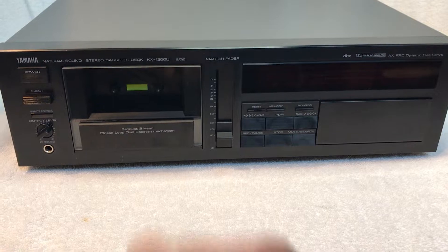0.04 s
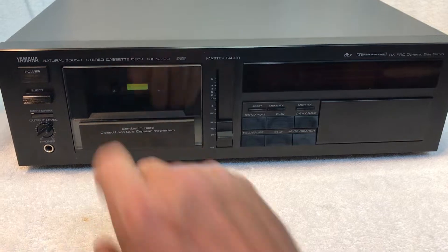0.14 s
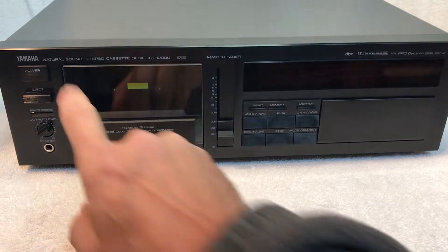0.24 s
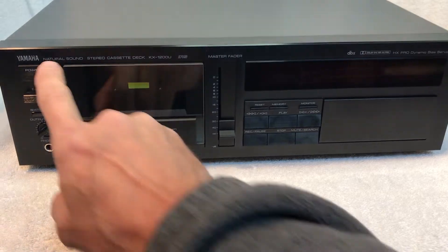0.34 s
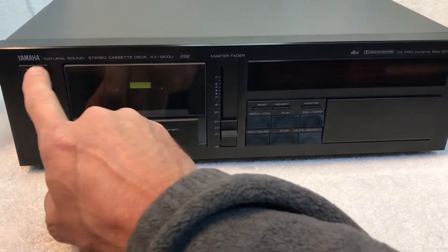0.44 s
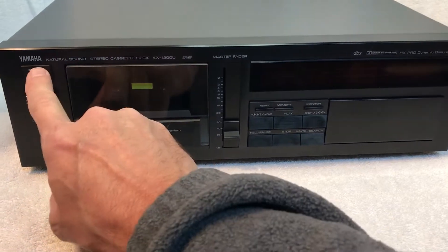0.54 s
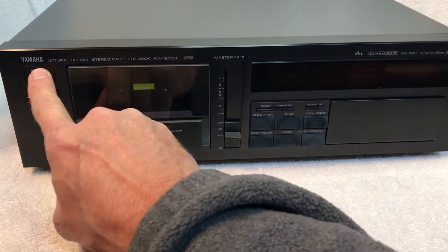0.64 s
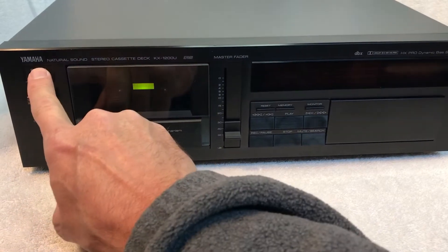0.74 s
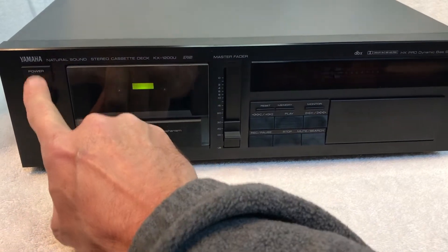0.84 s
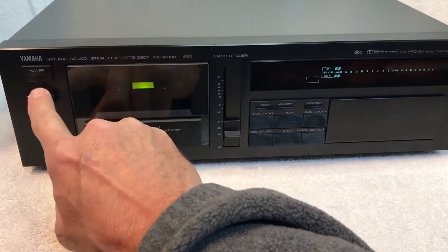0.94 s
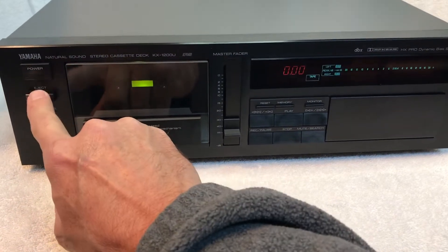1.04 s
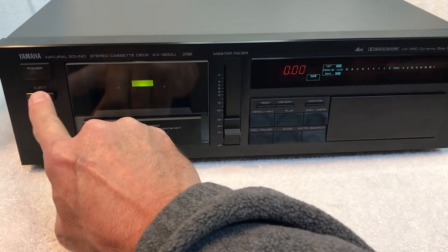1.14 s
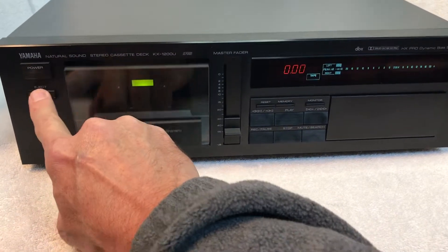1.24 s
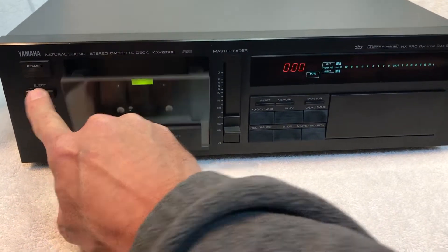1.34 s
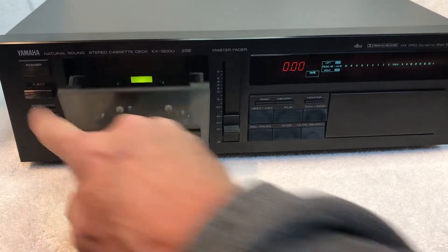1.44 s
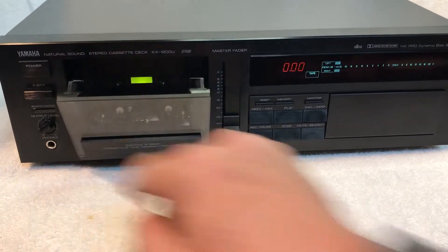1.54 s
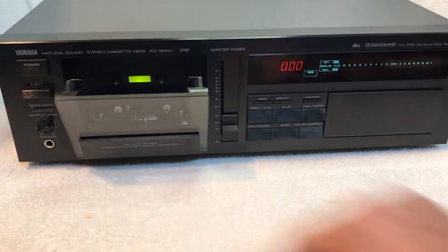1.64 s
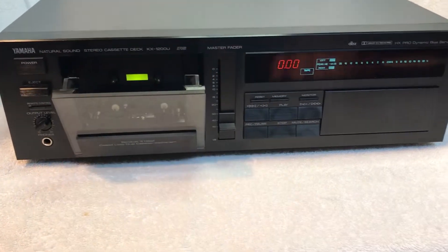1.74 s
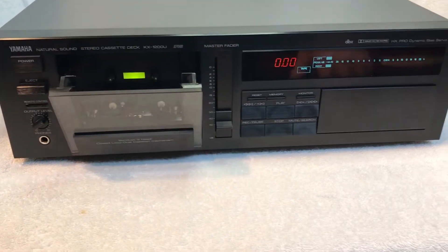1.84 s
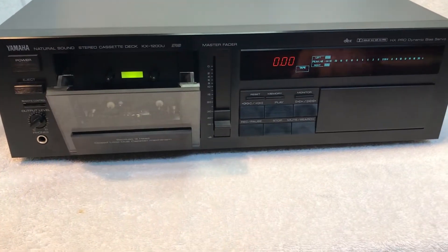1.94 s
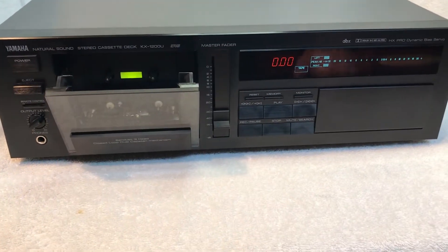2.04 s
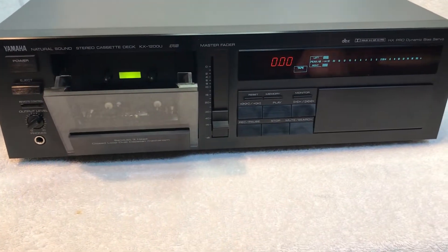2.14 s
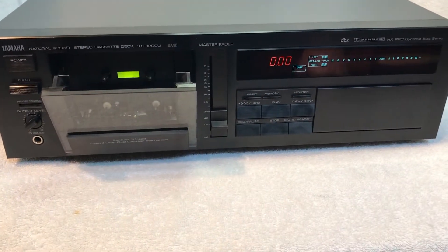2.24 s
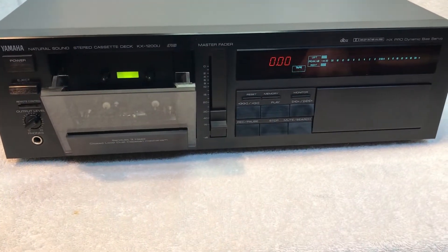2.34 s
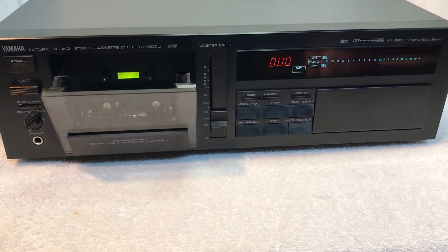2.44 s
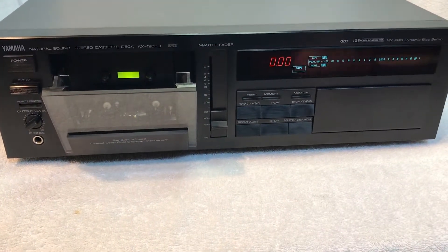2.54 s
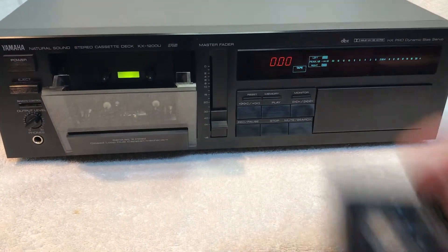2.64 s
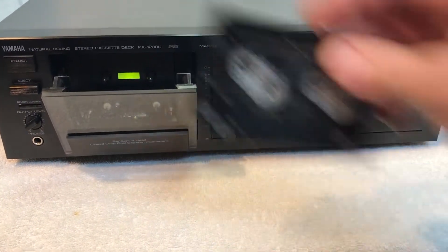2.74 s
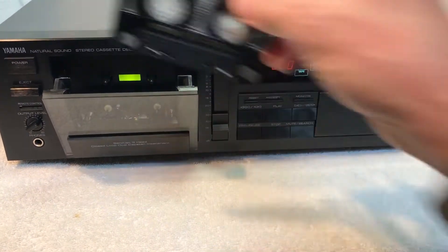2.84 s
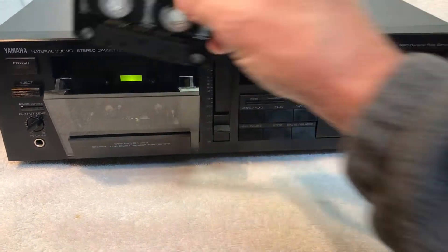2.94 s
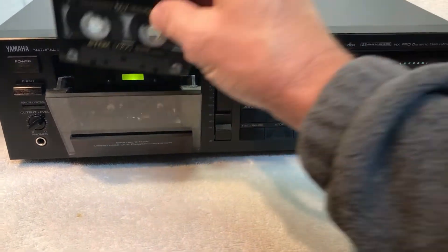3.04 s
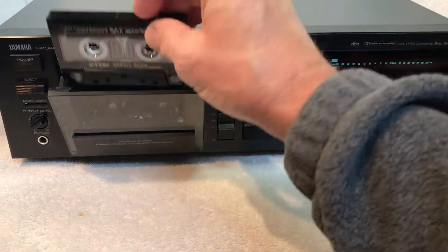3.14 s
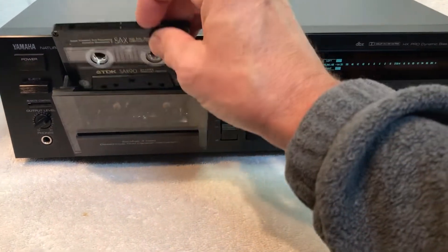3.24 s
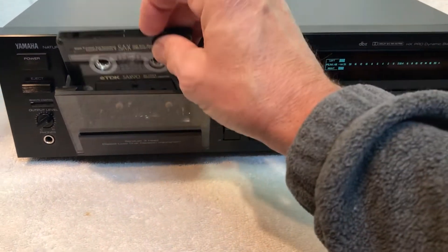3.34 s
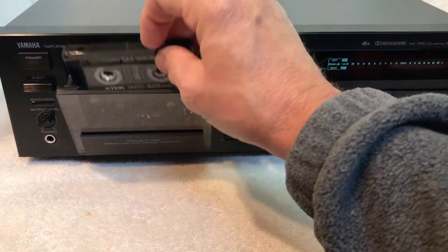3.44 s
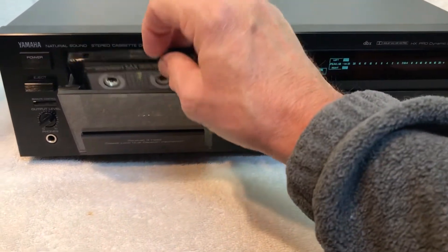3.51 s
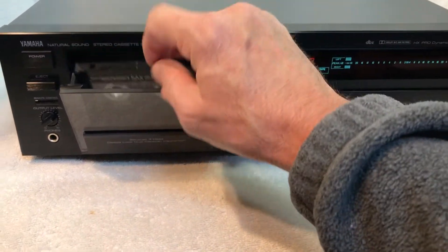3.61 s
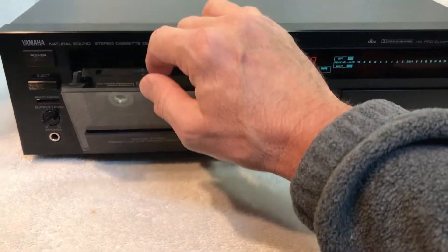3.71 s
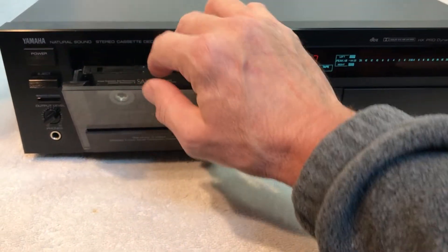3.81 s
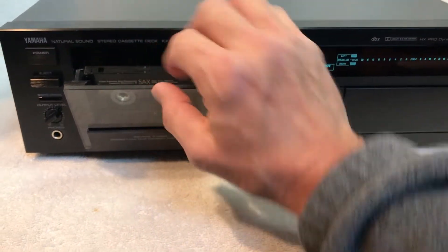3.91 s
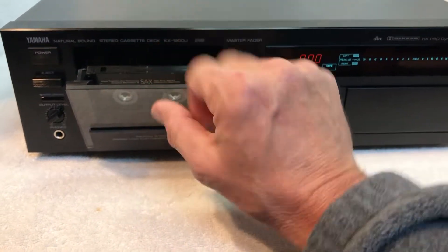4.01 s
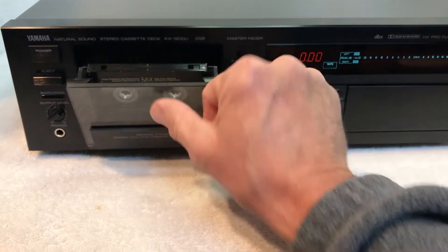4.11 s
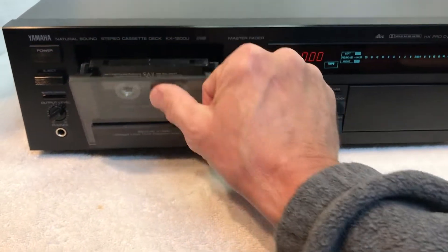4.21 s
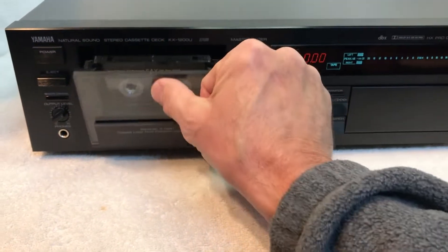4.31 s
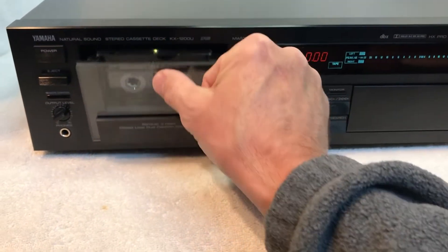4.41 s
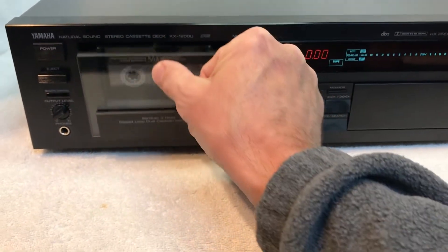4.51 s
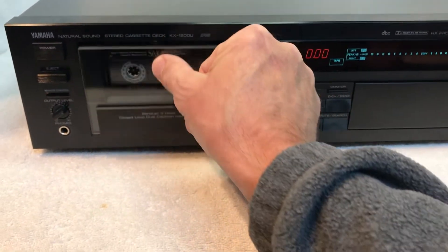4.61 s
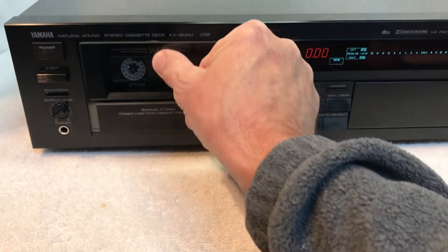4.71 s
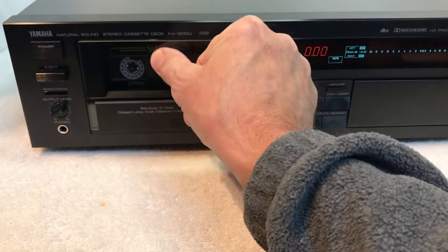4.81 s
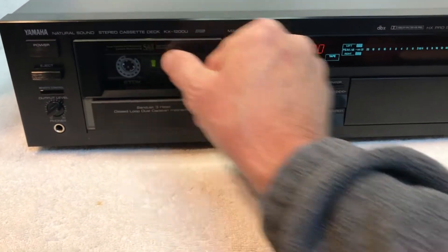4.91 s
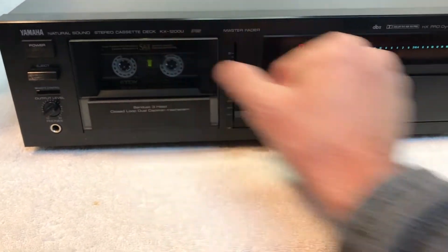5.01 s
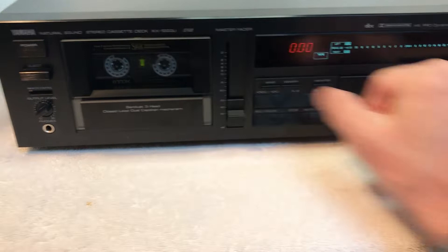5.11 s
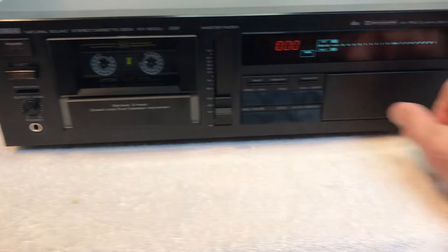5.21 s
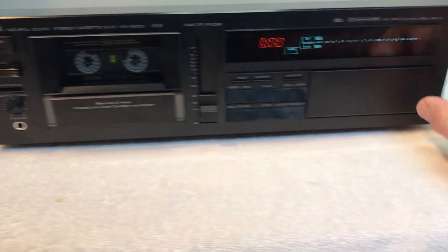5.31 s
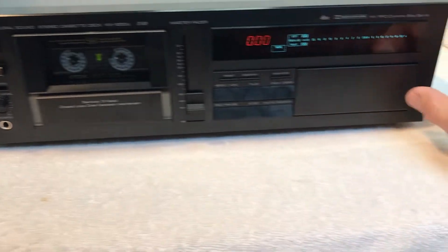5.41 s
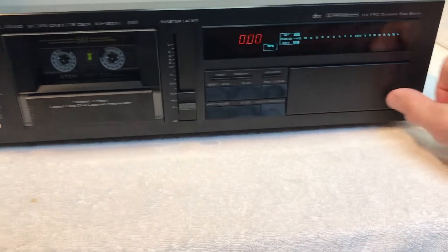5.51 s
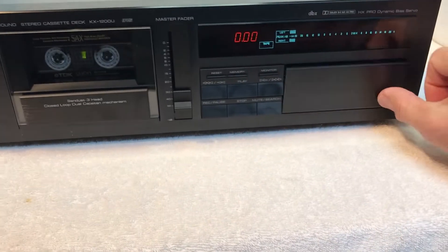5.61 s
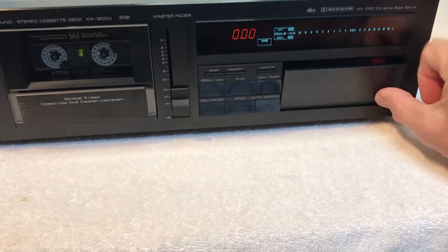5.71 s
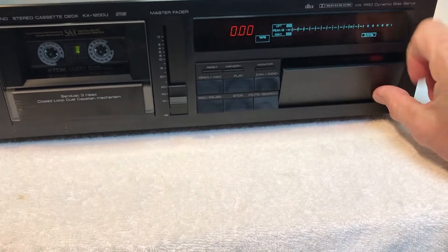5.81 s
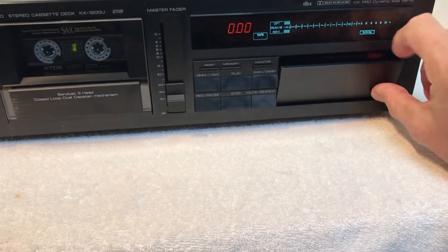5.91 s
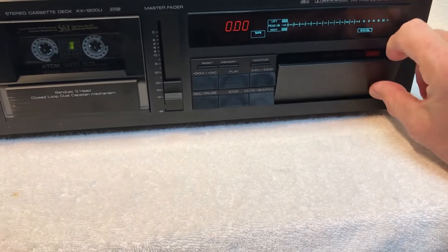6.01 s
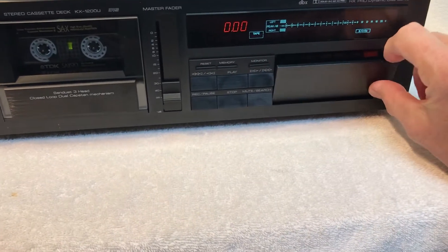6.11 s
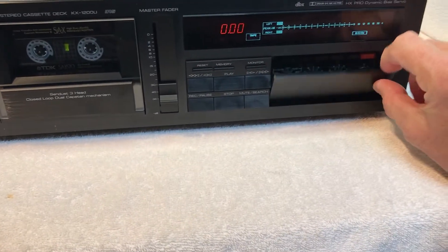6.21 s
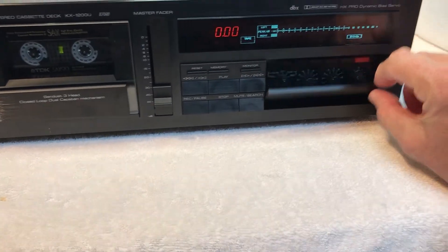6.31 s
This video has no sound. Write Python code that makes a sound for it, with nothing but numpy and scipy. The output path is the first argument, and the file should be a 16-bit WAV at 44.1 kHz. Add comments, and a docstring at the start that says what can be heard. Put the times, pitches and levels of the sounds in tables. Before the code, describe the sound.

Plastic clicks and clunks as a cassette deck is switched on, its door springs open, and a tape is loaded and shut in.

```python
"""A small quiet room, a cassette deck on a towel close to the microphone. The power button clicks, the
eject key lets the sprung door fly open, a cassette is picked up, slid in and dropped home, the door is
pushed shut and a flap is pressed open. Each knock is a short chatter of plastic that rings its part and
thumps the steel case; fingers and shells rub in between, over faint rumble, hum and hiss."""
import sys
import numpy as np
from scipy import signal
from scipy.fft import rfft, irfft
from scipy.io import wavfile
from scipy.ndimage import uniform_filter1d

SR = 44100
rng = np.random.default_rng(int(sys.argv[2]) if len(sys.argv) > 2 else 0)


def dump(signal):
    """Clip the signal to [-1, 1] and save it as 16-bit WAV at the path in sys.argv[1]."""
    limited = np.clip(np.atleast_2d(signal).T, -1, 1)
    pcm = np.round(limited * 32767).astype(np.int16)
    wavfile.write(sys.argv[1], SR, pcm)


N = 280035


def undb(db):
    """Decibels to gain."""
    return 10 ** (np.asarray(db) / 20)


def unit(x):
    """Scale to rms 1."""
    return x / np.sqrt(np.mean(x ** 2))


def decay(t, t60_s):
    """Exponential fall, 60 dB in t60_s."""
    return np.exp(-np.log(1000) * t / t60_s)


def add(track, start_s, x):
    """Mix x into the track at start_s."""
    i = max(int(start_s * SR), 0)
    track[i:i + len(x)] += x[:max(N - i, 0)]


def colour(x, points):
    """Minimum-phase filter through (f/Hz, gain/dB) points."""
    size = 2048
    hz, db = np.transpose(points)
    log_hz = np.log(np.fft.rfftfreq(size, 1 / SR) + 1)
    gain = undb(np.interp(log_hz, np.log(hz), db))
    cepstrum = irfft(np.log(gain))
    cepstrum[1:size // 2] *= 2
    cepstrum[size // 2 + 1:] = 0
    response = irfft(np.exp(rfft(cepstrum)))
    return signal.oaconvolve(x, response)[:len(x)]


def plastic(low_db, treble_db):
    """Contact spectrum: heavy parts add low-mids, hard edges add treble."""
    return [(90, low_db - 19), (300, low_db - 8.5), (470, low_db - 3), (650, low_db + 1),
            (1300, 0.11 * low_db), (3400, 0.0075), (7500, treble_db - 4), (15000, 1.3 * treble_db - 11)]


def ring(x, modes):
    """The contact plus the damped modes it excites."""
    t = np.arange(SR // 2) / SR
    response = np.zeros(len(t))
    response[0] = 1
    for hz, t60_s, db in modes:
        damping = np.log(1000) / t60_s
        response += undb(db) * 2 * damping / SR * decay(t, t60_s) * np.cos(2 * np.pi * hz * t)
    return signal.oaconvolve(x, response)[:N]


def spot_ring(x, hz, boost_db, q):
    """The touched spot rings for a few cycles at its own pitch."""
    b, a = signal.iirpeak(hz, q, fs=SR)
    return x + undb(boost_db) * signal.lfilter(b, a, x)


def grains(count, grit_db):
    """Tiny collisions of bounded size; grit spreads their sizes."""
    noise, size = rng.standard_normal((2, count))
    spread = np.repeat(2 * np.tanh(size / 2), 20)[:count]
    return unit(noise * undb(grit_db * spread))


def stroke(middle_s, half_s, db, grit_db):
    """Stick-slip contact that swells and fades; returns start time and force."""
    count = SR // 2
    t = (np.arange(count) - count / 2) / SR
    speed = np.exp(-(t / half_s) ** 2)
    grip = unit(uniform_filter1d(rng.standard_normal(count), size=200))
    slips = undb(0.5 * grit_db * np.tanh(grip))
    force = unit(speed * slips * grains(count, grit_db))
    return middle_s + t[0], undb(db) * force * np.sqrt(np.mean(speed ** 2))


def chatter(t60_s, rise_s, grit_db):
    """Two parts meet and settle in a decaying burst of grains."""
    t = np.arange(8000) / SR
    envelope = (1 - np.exp(-t / rise_s)) * decay(t, t60_s)
    return unit(grains(len(t), grit_db) * envelope) * np.sqrt(np.mean(envelope ** 2))


def crack(db, hz, treble_db, low_db, base_t60_s, rise_s, boost_db):
    """One plastic contact: harder blows chatter longer; hard or blunt ones are fuller."""
    force_db = db + 41
    burst = chatter(base_t60_s * undb(0.065 * force_db), rise_s, grit_db=-2)
    body_db = low_db + 0.2 * force_db - 0.7 * treble_db
    contact = colour(burst, plastic(body_db, treble_db))
    return undb(db + 4) * spot_ring(contact, hz, boost_db, q=5.4)


def knocks(hits, thump_db, **contact):
    """Each hit cracks and, in proportion, pushes the case once and rattles as the parts settle."""
    cracks, pushes = np.zeros((2, N))
    for s, db, hz, treble_db in hits:
        add(cracks, s, crack(db, hz, treble_db, **contact))
        add(pushes, s + 0.004, [undb(db + thump_db + 18)])
        add(pushes, s, undb(db + thump_db - 4) * chatter(t60_s=0.25, rise_s=0.016, grit_db=-3.5))
    return cracks, pushes


# room tone spectrum: f/Hz, gain/dB
ROOM_TONE = [(15, -52.5), (25, -13), (42, -3), (111, -7.5), (134, -2), (149, -13.5), (236, -5), (317, -12),
             (363, -16), (659, -18.5), (1070, -21.5), (1260, -23), (1610, -23.5), (3920, -26),
             (16000, -32.5)]
# mains lines: f/Hz, level/dB
MAINS_HUM = [(120, -86.5), (240, -81.5)]
# hiss onsets: t/s
HISS_STARTS = [1.467, 4.827]
# hiss spectrum: f/Hz, gain/dB
HISS_SPECTRUM = [(100, -4.5), (1000, 3.5), (8000, -2), (16000, -9)]
ROOM_TONE_DB, HISS_DB, HISS_HOLD_S = -69.5, -66.5, 0.397


def background():
    """Room rumble, faint mains hum, and a hiss that hangs on after the two sharpest snaps."""
    t = np.arange(N) / SR
    tone = undb(ROOM_TONE_DB) * unit(colour(rng.standard_normal(N), ROOM_TONE))
    hum = sum(undb(db) * unit(np.sin(2 * np.pi * hz * t)) for hz, db in MAINS_HUM)
    hiss = undb(HISS_DB) * unit(colour(rng.standard_normal(N), HISS_SPECTRUM))
    gate = sum((t > s) & (t < s + HISS_HOLD_S) for s in HISS_STARTS)
    return tone + hum + gate * hiss


# reverb bands: f/Hz, t60/s, energy/dB
ECHO_BANDS = [(60, 0.89, 0.5), (146, .9, -5.5), (306.6, 0.7, -3.5), (585, 0.4, -3), (1256, 0.2, -5.5),
              (2480, 0.11, -7.5), (5230, 0.084, -12), (10100, 0.13, -18.5), (16000, 0.16, -22)]


def room(x):
    """Adds diffuse echo from near walls; bass stays longest."""
    t = np.arange(SR) / SR
    spectrum = rfft(rng.standard_normal(SR))
    log_hz = np.log(np.arange(len(spectrum)) + 1)
    centres = np.log(np.array(ECHO_BANDS)[:, 0])
    echo = 0
    for (_, t60_s, db), band in zip(ECHO_BANDS, np.eye(len(ECHO_BANDS))):
        noise = irfft(spectrum * np.interp(log_hz, centres, band))
        fade = (1 - np.exp(-t / 0.0033)) * decay(t, t60_s)
        echo += undb(db) * noise * fade / np.linalg.norm(fade)
    return x + signal.oaconvolve(x, echo)[:N]


def table_bump(start_s=6.06, hz=65.7, t60_s=0.15, db=-52):
    """The padded table gives one short low wobble."""
    t = np.maximum(np.arange(N) / SR - start_s, 0)
    envelope = (1 - np.exp(-t / 0.0058)) * decay(t, t60_s)
    return undb(db) * envelope * np.sin(2 * np.pi * hz * t)


# skin and sleeve strokes: mid t/s, half length/s, level/dB
BRUSH_STROKES = [(.421, .097, -71.5), (2.399, 0.044, -57), (2.852, 0.029, -65), (5.39, .055, -66),
                 (6.27, 0.052, -70.5)]


def brushing():
    """Skin and sleeve brush past, smooth and bright."""
    friction = np.zeros(N)
    for s, half_s, db in BRUSH_STROKES:
        add(friction, *stroke(s, half_s, db, grit_db=2.5))
    bright = colour(friction, plastic(low_db=-6, treble_db=3.5))
    return spot_ring(bright, hz=4730, boost_db=-2, q=2)


# hand and door leaning on the case: mid t/s, half length/s, level/dB
CASE_SHOVES = [(.92, 0.03, -61), (1.331, 0.031, -54.5), (1.42, 0.028, -61), (1.64, 0.049, -62),
               (3.37, 0.083, -60.5), (3.63, 0.18, -64), (4.311, 0.047, -64.5), (4.6, 0.53, -73),
               (4.812, 0.0087, -52), (4.961, 0.016, -50.5), (5.605, 0.046, -57), (5.751, .065, -57)]
# dull push spectrum: f/Hz, gain/dB
THUMP_SPECTRUM = [(30, -30), (60, -5), (100, -11), (150, 1.5), (250, 3), (320, -9.5), (500, -22),
                  (900, -15), (2500, -44.5)]
# steel case modes: f/Hz, t60/s, gain/dB
STEEL_MODES = [(57, 0.28, 2), (132.6, 0.29, 13.3), (185.4, 0.59, 9.9), (209, 0.58, 6.3), (246, 0.099, 6.6),
               (267.4, 0.95, 13), (327, 0.24, 13), (446, 0.23, 6.6), (487, 0.37, 9)]


def steel_case(deck_push, shell_push):
    """Door and keys knock the front panel, the falling cassette moves more bass, shoves load the case."""
    front = colour(deck_push, [(60, -3.5), (125, -5), (200, 3), (300, -4), (480, 7.5)])
    down = colour(shell_push, [(60, 5.5), (125, -0.5), (200, -2), (300, 0.5), (480, 2.5)])
    shoves = np.zeros(N)
    for s, half_s, db in CASE_SHOVES:
        add(shoves, *stroke(s, half_s, db, grit_db=5.5))
    thumps = colour(front + down + shoves, THUMP_SPECTRUM)
    return undb(17) * ring(thumps, STEEL_MODES)


def rubbing(strokes, low_db, grit_db):
    """Grainy strokes on hard plastic, each with its own brightness."""
    track = np.zeros(N)
    for s, half_s, db, treble_db in strokes:
        start_s, force = stroke(s, half_s, db, grit_db)
        add(track, start_s, colour(force, plastic(low_db, treble_db)))
    return track


# scrapes in the deck: mid t/s, half length/s, level/dB, treble/dB
DECK_SCRAPES = [ (.643, 0.016, -53.5, -17), (1.37, 0.3, -72.5, -11), (1.449, .02, -63.5, -1.5),
                (3.341, 0.0049, -52.5, 0), (3.41, 0.16, -68.5, -2.5), (3.58, 0.093, -66.5, 3.5),
                (3.69, 0.045, -63, 3.5), (3.756, 0.01, -53, -1), (4.447, .25, -78, 4),
                (4.735, 0.013, -45.5, -4.5), (4.79, 0.06, -53, -8), (5.599, 0.049, -61.5, -7),
                (5.659, 0.0091, -43.5, -41), (5.733, 0.052, -60.5, -2), (5.774, 0.022, -49, 1)]


def scraping():
    """Plastic slides on plastic inside the deck."""
    friction = rubbing(DECK_SCRAPES, low_db=5.8, grit_db=6.5)
    return spot_ring(friction, hz=1490, boost_db=1.5, q=2.5)


# fingers on the shell: mid t/s, half length/s, level/dB, treble/dB
FINGER_SLIDES = [(2.27, 0.0074, -54, -21), (2.45, 0.044, -61, -9), (2.504, 0.012, -48, -10),
                 (2.705, 0.019, -49.5, 3.5), (2.94, 0.096, -62.5, -15), (3.125, 0.018, -60.5, -24)]
# loose hub ticks: t/s, level/dB, f/Hz
HUB_TICKS = [ (2.202, -55, 2600), (2.214, -43.5, 4640), (2.282, -56, 5600), (2.427, -51, 5430),
             (2.469, -46, 1660), (2.489, -40, 1040), (2.502, -43.5, 1930), (2.708, -38.5, 5000),
             (2.88, -48.5, 1020), (2.92, -40.5, 2550), (2.932, -46.5, 2600), (2.964, -42, 1700),
             (2.981, -50.5, 4550), (2.994, -43, 6860), (3.1717, -43.5, 3780), (3.1811, -45, 3880)]
# hand-held shell modes: f/Hz, t60/s, gain/dB
HELD_MODES = [(1056, 0.017, 3.5), (1246, 0.017, -6), (1685, 0.035, -1), (1777, 0.037, 4.5),
              (2170, 0.062, -20)]


def cassette_in_hand():
    """Fingers slide and hubs tick, brighter the higher they ring; the hollow shell gives little bass."""
    contact = rubbing(FINGER_SLIDES, low_db=9, grit_db=7.5)
    for s, db, hz in HUB_TICKS:
        treble_db = 5 * np.log2(hz / 5500)
        tick = crack(db, hz, treble_db, low_db=10, base_t60_s=0.021, rise_s=0.00068, boost_db=5)
        add(contact, s, tick)
    radiation = [(500, -20), (800, -16), (1050, -3.5), (2300, 1.5), (3200, 1.5), (6000, 7),
                 (9000, 1), (14000, -3)]
    return colour(ring(contact, HELD_MODES), radiation)


# cassette against its holder: t/s, level/dB, f/Hz, treble/dB
HOLDER_KNOCKS = [ (3.257, -45, 607, -1.5), (3.3464, -36, 1450, 6.5), (3.3642, -40, 5230, 0),
                 (3.385, -50, 590, -9), (3.418, -52, 1800, -1.5), (3.552, -43, 1880, -4),
                 (3.578, -47.5, 1250, -6.5), (3.631, -45, 3200, 8), (3.6755, -47, 2000, -0.5),
                 (3.686, -46, 2270, -1), (3.701, -49, 3110, -2), (3.770, -29.5, 2200, -0.5),
                 (3.7764, -23, 2300, 4.5), (3.798, -36.5, 2310, 3.5), (3.952, -58.5, 2490, 3.5),
                 (3.965, -50.5, 3000, -10), (4.276, -49.5, 2300, -3), (4.312, -47.5, 2300, -4),
                 (4.344, -53.5, 2260, -7), (4.7072, -39, 2310, 0), (4.738, -45.5, 2370, 5.5)]
# shell modes in the holder: f/Hz, t60/s, gain/dB
SEATED_MODES = [(445.3, .2, 2.5), (637, 0.4, 1), (733, 0.13, 9), (1100, 0.035, 10.5), (1366, .05, -2.5),
                (1940, 0.066, 2.5), (2328, 0.029, 7), (2585, 0.05, -3), (2982, .04, 1.5),
                (3250, 0.06, -2.5), (5554, 0.051, 5.5), (6900, 0.013, 4), (9800, 0.014, 4.5),
                (11280, 0.016, 15.5)]


def cassette_in_holder(scrape):
    """The shell rings as it slides in, drops home and is rocked by the door; returns sound, case push."""
    cracks, push = knocks(HOLDER_KNOCKS, thump_db=-17.5, low_db=1.5,
                          base_t60_s=0.026, rise_s=0.00057, boost_db=4.5)
    shell = ring(cracks + undb(-11.5) * scrape, SEATED_MODES)
    radiation = [(400, 2), (900, -2), (2300, -0.5), (3200, 2), (4200, -1), (5500, 1), (8000, -5),
                 (11500, -5.5), (15000, -5.5)]
    return colour(shell, radiation), push


# power button, eject key, door opening, door latching, flap: t/s, level/dB, f/Hz, treble/dB
MECHANISM_KNOCKS = [ (.655, -47.5, 3500, -9), (.7522, -32, 3100, 4), (.770, -46.5, 1780, -1),
                    (.8965, -45, 6860, 0), (.905, -39.5, 1020, -6.5), (.950, -44, 965, -19.5),
                    (1.233, -40.5, 1090, 1.5), (1.251, -50.5, 12300, 4), (1.301, -46.5, 3750, -4.5),
                    (1.319, -44, 700, -7.5), (1.386, -52.5, 3150, -6.5), (1.4595, -30, 3390, 10),
                    (1.4665, -23, 3175, 2), (4.644, -48, 994, -9), (4.657, -49.5, 822, 8.5),
                    (4.763, -47.5, 1500, -8), (4.8105, -25, 1410, 2.5), (4.8252, -24.5, 3440, 11.5),
                    (4.8283, -20.5, 3490, 1), (4.8373, -25, 9490, 4), (4.951, -38.5, 617, 1.5),
                    (5.566, -43, 860, 2), (5.577, -41.5, 633, -5.5), (5.657, -41, 1860, -5),
                    (5.691, -45.5, 5570, 4), (5.704, -47.5, 2940, 8), (5.759, -41.5, 920, -11),
                    (5.776, -49, 1870, 7)]
# deck part modes: f/Hz, t60/s, gain/dB
MECHANISM_MODES = [(440.2, 0.26, 13.5), (570, 0.073, 7.5), (691, 0.032, 4.5), (789, 0.049, -4),
                   (1033, 0.035, 5), (1353, 0.072, -1), (1627, 0.07, 8), (2069, 0.085, 6.5),
                   (2673, 0.054, 2.5), (2710, 0.036, -3), (3510, 0.2, -3), (4160, 0.063, 7),
                   (6530, .06, 3.5), (8540, 0.072, 4.5), (8590, 0.07, 8), (9560, 0.02435, 5),
                   (14800, 0.033, 10), (15400, 0.037, 11.5)]


def deck_mechanism():
    """Keys, door and flap snap and ring, radiating from the door's face; returns sound, case push."""
    cracks, push = knocks(MECHANISM_KNOCKS, thump_db=-21, low_db=-2,
                          base_t60_s=0.031, rise_s=0.0016, boost_db=3.5)
    radiation = [(450, -3), (650, 0), (1100, 0.5), (1700, 1), (3500, 0.5), (4900, -2), (7500, -2),
                 (11500, -3), (15000, -1)]
    return colour(ring(cracks, MECHANISM_MODES), radiation), push


def scene():
    """Deck parts and cassette ring on their own and load the same steel case; mono."""
    deck, deck_push = deck_mechanism()
    scrape = scraping()
    shell, shell_push = cassette_in_holder(scrape)
    case = steel_case(deck_push, shell_push)
    direct = deck + shell + scrape + case + cassette_in_hand() + brushing()
    return (room(direct) + table_bump() + background())[None]


def record(dry):
    """High-pass at 42 Hz, steep low-pass at 16.2 kHz."""
    thinned = signal.sosfilt(signal.butter(3, 42, "high", fs=SR, output="sos"), dry)
    return signal.sosfilt(signal.ellip(10, 0.2, 70, 16200, fs=SR, output="sos"), thinned)


dry = scene()
out = record(dry)
dump(out)
```